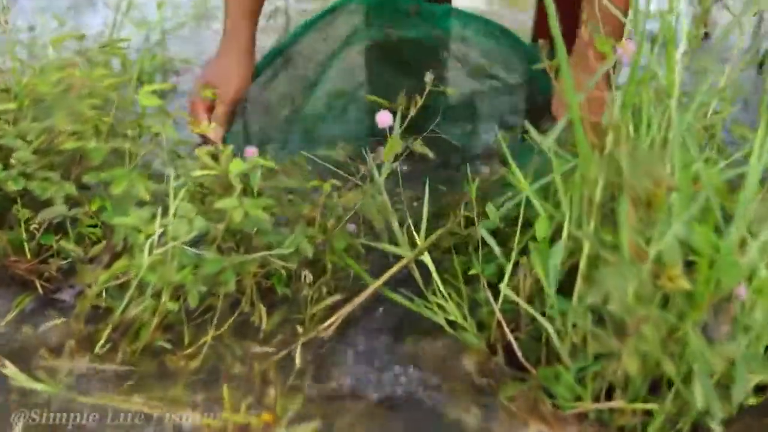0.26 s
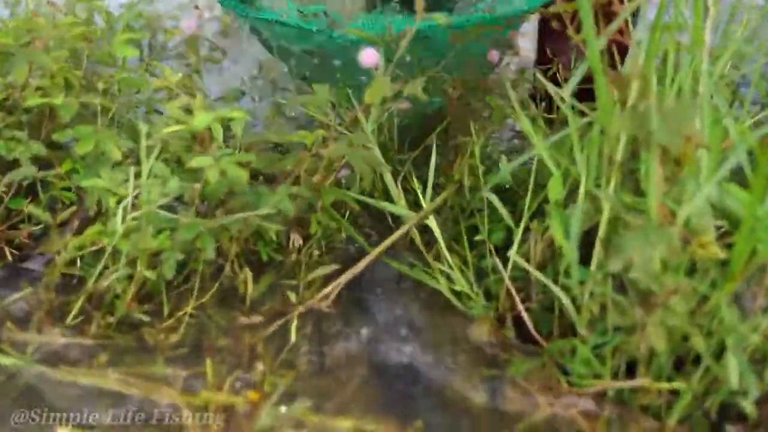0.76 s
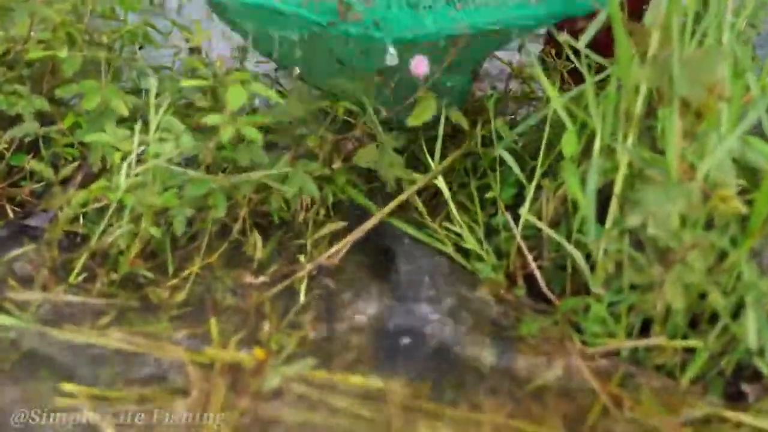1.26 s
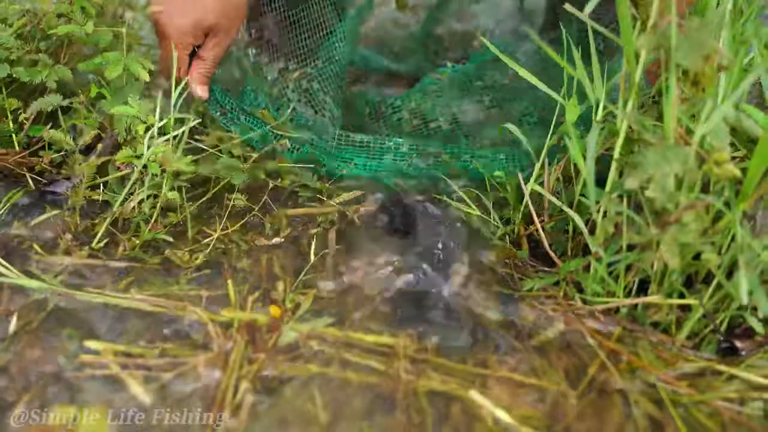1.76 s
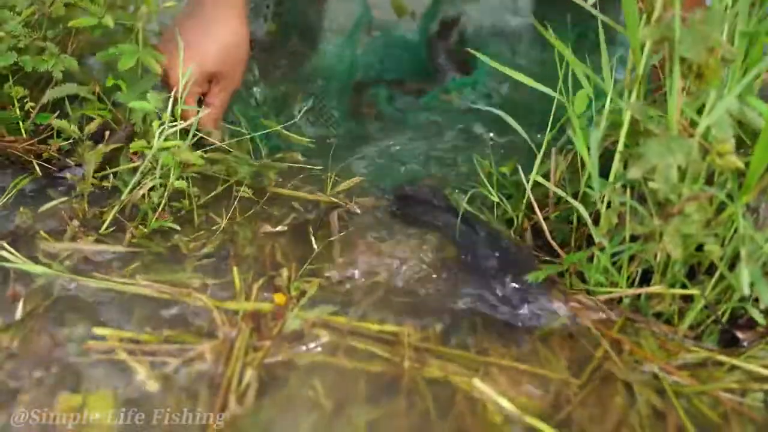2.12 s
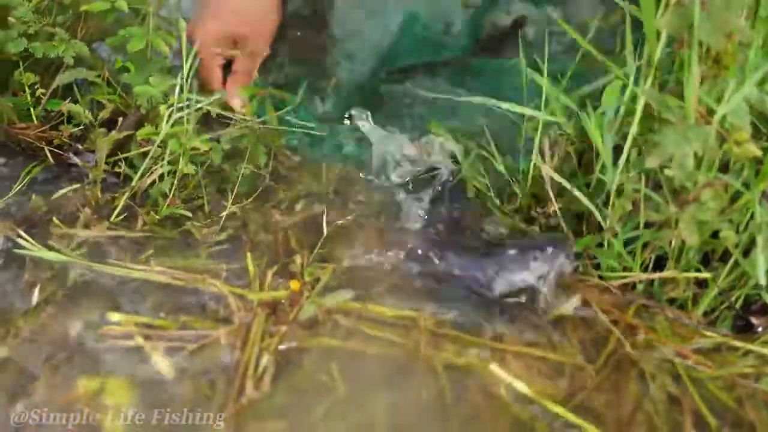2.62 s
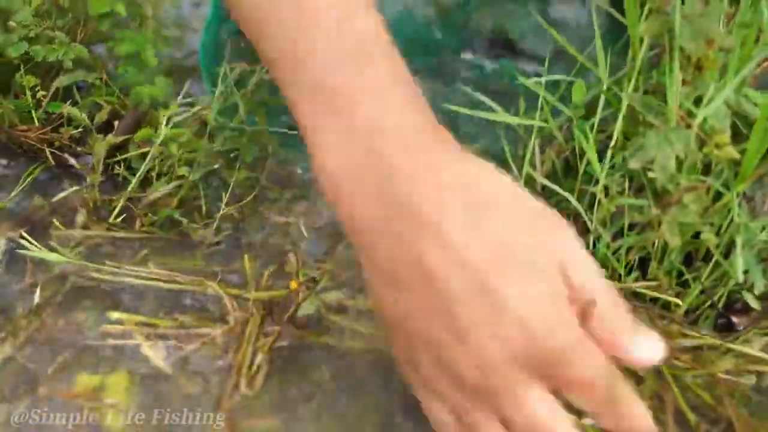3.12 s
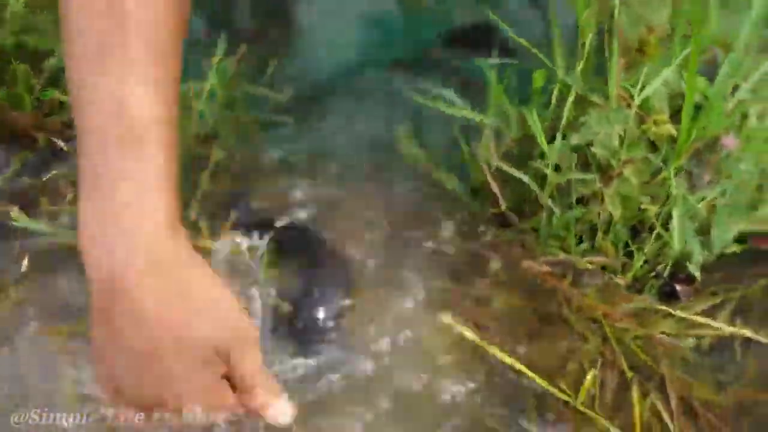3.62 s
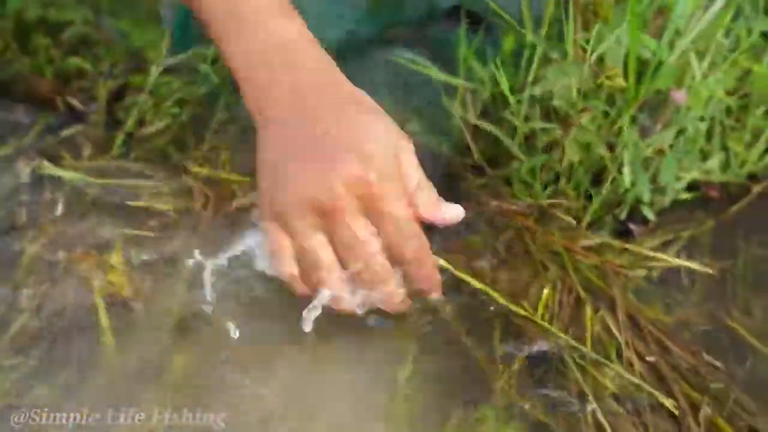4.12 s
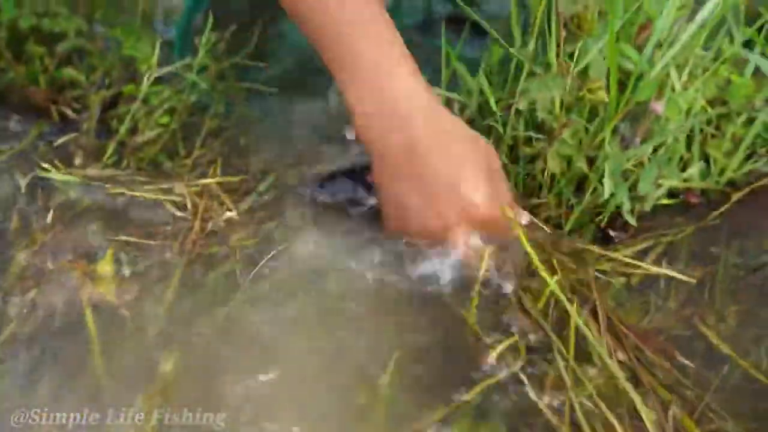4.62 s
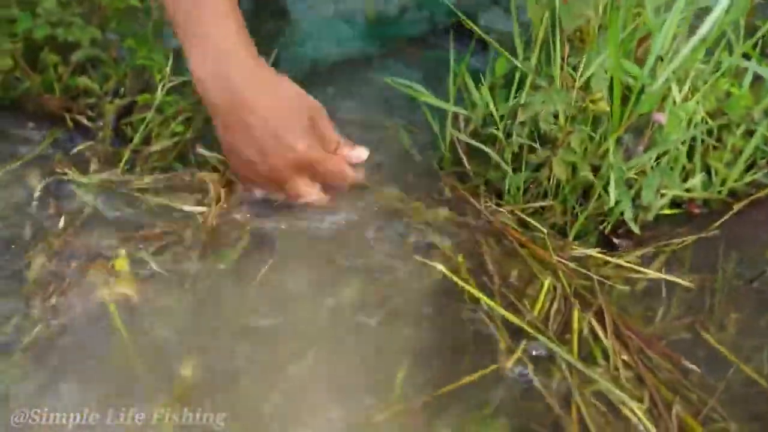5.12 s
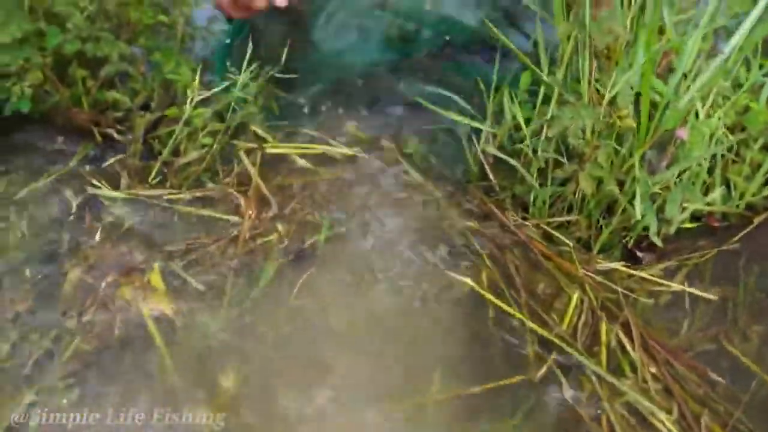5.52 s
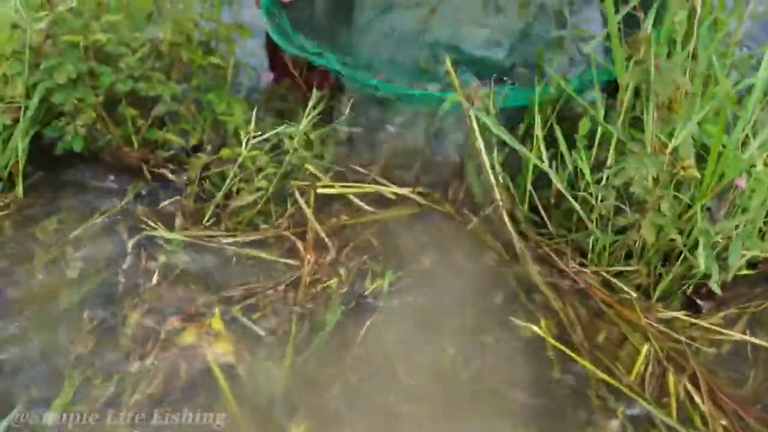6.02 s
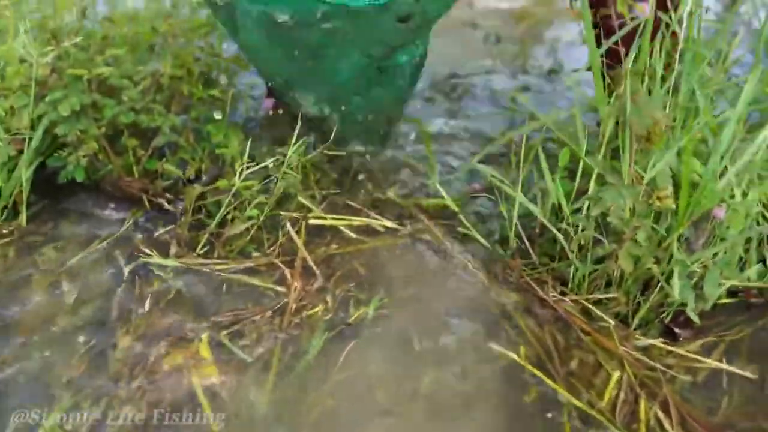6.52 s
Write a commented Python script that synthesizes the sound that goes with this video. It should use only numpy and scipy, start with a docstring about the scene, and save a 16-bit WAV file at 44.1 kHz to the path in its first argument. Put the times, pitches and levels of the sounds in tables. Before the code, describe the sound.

A fish thrashes in shallow grassy floodwater, with bursts of bubbly splashing, gulping plops and fine spray, then trickling drips over a faint outdoor hum.

```python
"""In shallow floodwater among grass, a fish thrashes close by while hands and a net chase it.
Air trapped by the splashes rings as bubbles, many with rising pitch: deep gulps, plips, fizz and fine spray.
Single plops, ticking droplets and stray drips stand out, and a short scattered tail follows the water.
A far drone, light wind on the microphones and a soft bed of coloured noise lie underneath."""
import sys
import numpy as np
from scipy import signal
from scipy.fft import rfft, irfft
from scipy.io import wavfile
from scipy.ndimage import uniform_filter1d

SR = 44100
rng = np.random.default_rng(int(sys.argv[2]) if len(sys.argv) > 2 else 0)


def put_to_file(sound):
    """Save the sound as 16-bit audio at rate SR, in the file named by the first command-line argument."""
    columns = np.atleast_2d(sound).T  # one column per channel
    safe = np.clip(columns, -1, 1)
    whole_steps = np.round(safe * 32767)
    wavfile.write(sys.argv[1], SR, whole_steps.astype(np.int16))


N = 298116


def gain_of(db):
    """Turn decibels into an amplitude factor."""
    return 10 ** (np.asarray(db) / 20)


def evened(x):
    """Scale to an average (RMS) level of 1."""
    return x / np.sqrt(np.mean(x ** 2) + 1e-20)


def sides(pan_db):
    """Left and right gains for a given left-minus-right difference in dB."""
    return gain_of(np.array([pan_db / 2, -pan_db / 2]))


def add(mix, start_s, sound):
    """Add a sound to the mix at its start time, cut off at the end of the mix."""
    part = mix[:, round(start_s * SR):][:, :sound.shape[1]]
    part += sound[:, :part.shape[1]]


def thrashing():
    """Gains of fizz, gulps and spray and the left-right lean: splashes rise, hold and settle over a trickle."""
    # Splashes of fish, hand or net. Each row: start in seconds, hold in seconds, fizz level in dB,
    # gulps in dB relative to fizz, spray in dB relative to fizz, left minus right in dB.
    splashes = [(0.034, 0.013, -53.5, -1, 1, -0.5), (0.56, .13, -55, -10, 0, -.5),
                (1.233, 0.026, -59, 0, -11, -1), (1.587, 0.074, -44, -0.5, -4.5, -2),
                (1.70, 0.17, -42.5, -8.5, -6, 0.5), (2.386, 0.13, -45.5, -6.5, -5, -4.5),
                (2.522, 0.042, -43, 3, -6, -5), (2.605, 0.045, -42.5, -16, -6, -2.5),
                (2.69, 0.02, -39, -4, -3, -2), (2.742, 0.071, -46, 0.5, -7, -3.5),
                (2.841, 0.1, -52, -6.5, -2.5, -2), (3.102, 0.014, -48, -9, -4.5, -1),
                (3.243, 0.13, -54.5, -9.5, -9, -3), (3.465, 0.04, -45.5, -14, -6, -2),
                (3.619, 0.013, -43, -27, -1, 1), (3.659, 0.015, -45, -3.5, -14, .5),
                (4.132, 0.068, -47.5, -5.5, -7.5, -0.5), (4.286, 0.018, -39.5, -21, -5, -1.5),
                (4.346, 0.031, -48.5, -4, -15, -1.5), (4.524, .04, -57, -1, -3, -2.5),
                (4.578, 0.082, -48, -4, -6, -1.5), (4.70, 0.059, -53.5, -5.5, -7, -2.5),
                (4.853, 0.023, -47.5, -10, -7, -2.5), (4.945, .025, -46, -7, -8.5, 0.5),
                (5.393, 0.072, -59.5, -21, 1.5, 0), (5.999, 0.085, -52, -26, -2, -3.5),
                (6.13, 0.21, -56.5, -11, -4, -3), (6.244, 0.15, -53, -15, -8, -1.5),
                (6.406, 0.16, -53.5, -7, -6, 0)]
    # Water running and dripping between splashes. Each row: time in seconds, fizz level in dB.
    trickle = [(0, -61.5), (.35, -63.5), (.8, -62.5), (1.4, -64), (2.0, -59.5), (3.0, -59), (3.8, -64),
               (4.5, -65.5), (5.1, -67.5), (5.3, -64), (5.55, -74.5), (5.88, -71), (6.1, -59), (6.76, -61)]
    rise_db_per_s, fall_db_per_s = 312, 245
    t = np.arange(0, N / SR + .002, .001)  # one step per millisecond
    trickle_db = np.interp(t, *np.transpose(trickle))
    power = [gain_of(2 * trickle_db)]  # doubling the dB gives power, so overlapping splashes can be summed
    mix = [(-5, 0.5, -1.5)]  # gulp, spray and pan of the trickle, in dB
    for start, hold, db, *colour in splashes:
        early = np.maximum(start - t, 0)
        late = np.maximum(t - start - hold, 0)
        level_db = db - rise_db_per_s * early - fall_db_per_s * late
        power.append(gain_of(2 * level_db))
        mix.append(colour)
    gulp_db, spray_db, pan_db = np.transpose(mix)
    fizz_power = np.sum(power, 0)
    gulp_power = gain_of(2 * gulp_db) @ power
    spray_power = gain_of(2 * spray_db) @ power
    lean_db = pan_db @ power / fizz_power  # the strongest splash decides the lean
    slow = np.sqrt(fizz_power), np.sqrt(gulp_power), np.sqrt(spray_power), lean_db
    return [np.interp(np.arange(N) / SR, t, curve) for curve in slow]


def bubble(hz, decay_s, rise, onset=0.13):
    """A pocket of air rings and fades, its pitch climbing as it nears the surface; its envelope peaks at 1."""
    u = np.arange(round(7 * decay_s * SR) + 8) / (decay_s * SR)  # time counted in decay times
    u = u / max(1, 1.5 / (hz * decay_s))  # stretch the briefest blips to a decay of 1.5 cycles
    shape = (1 - np.exp(-u / onset)) * np.exp(-u)
    pitch = np.minimum(hz * (1 + rise * np.minimum(u, 4)), SR / 2)
    phase = 2 * np.pi * np.cumsum(pitch) / SR
    return shape / shape.max() * np.sin(phase)


def swarm(lo_hz, hi_hz, tilt_db, cycles, per_s, spread_db, clump_db, width_s, count=40):
    """Many small bubbles of random size, bunched in time, placed between the microphones by small delays."""
    bunches = gain_of(clump_db * evened(uniform_filter1d(rng.standard_normal(N), size=300)))
    size = gain_of(spread_db * np.minimum(rng.exponential(1, N), 4))
    happens = rng.random(N) < per_s / SR
    strikes = size * happens * bunches * rng.choice([-1, 1], N)
    kind = rng.integers(0, count, N)  # each bubble takes one of a few ring shapes
    out = np.zeros((2, N))
    for k, (detune, rise, long, place) in enumerate(rng.random((count, 4))):
        step = (k + detune) / count
        hz = lo_hz * (hi_hz / lo_hz) ** step
        decay_s = cycles * (.5 + long) / hz
        ring = gain_of(tilt_db * step) * bubble(hz, decay_s, 0.188 * rise, 0.12)
        sound = signal.oaconvolve(strikes * (kind == k), ring)[:N]
        lag = round((2 * place - 1) * width_s * SR)  # path difference to the two microphones, in samples
        out += [sound, np.roll(sound, lag)]
    return evened(out)


def churn(fizz_gain, gulp_gain, spray_gain):
    """Bubble swarms from deep gulps to fine spray follow the thrashing; the spray leans right."""
    gulps = swarm(562.0, 1384, 8.6, 3.37, 600, 3.2, 4.8, .00009, count=14)
    plips = swarm(697, 3610, 2.0, 8.4, 90, 3.3, 1.46, .0001, count=14)  # longer ringing bubbles
    fizz = swarm(1222, 5190, 6.9, 3.17, 2800, 1.85, 2.63, 0.000079, count=22)
    spray = swarm(5310, 15200, -1.5, 2.27, 7000, 2.45, 2.15, .0003, count=18)
    spray = spray * sides(-1.9)[:, None]
    plips_db = -13.5  # relative to fizz
    fizz_and_plips = fizz + gain_of(plips_db) * plips
    return fizz_gain * fizz_and_plips + gulp_gain * gulps + spray_gain * spray


def bubbles():
    """The plops and blips that stand out, each one ringing pocket of air."""
    # Each row: start in seconds, peak level in dB before panning, starting pitch in Hz,
    # decay time in milliseconds (very short ones get stretched), share the pitch rises per decay time.
    plops = [(0.052, -39.5, 1540, 1.6, 0.02), (0.2635, -48, 797, 12, 0.11), (0.382, -38, 3640, 0.54, 0),
             (0.587, -39, 1584, 5.9, 0.02), (0.7172, -35.5, 3060, 0.6, 0.06), (1.086, -53, 1040, 8.4, 0.14),
             (1.145, -53, 1310, 7.7, 0), (1.175, -52, 1300, 5.8, 0.04), (1.205, -53, 1320, 6.2, 0),
             (1.247, -48.5, 1310, 7.4, 0), (1.29, -54, 1320, 6, 0), (1.33, -57, 1340, 6, 0),
             (1.5523, -44, 1580, 15, 0.01), (1.5546, -31.5, 2160, 2.6, 0.09), (1.5776, -45, 1260, 6.7, 0.4),
             (1.6028, -32, 735, 9.3, 0.05), (1.6441, -40.5, 1186, 13.4, 0.33),
             (1.7645, -39, 786, 9.9, 0.08), (1.8659, -18.5, 1222, 3.5, 0.06),
             (1.9397, -38.5, 3230, 1.7, 0.04), (2.0375, -47.5, 473, 34, 0.07), (2.3317, -39.5, 385, 3.0, 0),
             (2.384, -43, 875, 14, 0.27), (2.3873, -33, 1610, 2, 0.08), (2.4205, -37, 1720, 4.1, 0.06),
             (2.441, -30.5, 3700, 0.55, 0), (2.5166, -35, 740, 6.4, 0.2), (2.5275, -31, 1167, 6.2, 0.04),
             (2.5306, -39, 820, 4.2, 0.17), (2.5363, -28, 1280, 2.8, 0), (2.5753, -40, 1210, 6.4, 0),
             (2.651, -39, 548, 12, 0.3), (2.6538, -25.5, 2150, 1.6, 0.02), (2.684, -30, 2520, 2, 0.03),
             (2.6968, -35, 2110, 6.7, 0), (2.702, -19.5, 2600, 0.32, 0), (2.7068, -26.5, 1100, 1.3, 0.08),
             (2.7456, -34, 2720, 3.4, 0), (2.7522, -20, 2270, 0.5, 0), (2.7543, -31, 1870, 7, 0.1),
             (2.7646, -25.5, 1520, 1.8, 0), (2.7723, -30, 1414, 4.3, 0.07), (2.78, -28.5, 1590, 2.9, 0.03),
             (2.7846, -31, 2000, 3.7, 0), (2.8148, -33, 1200, 1.3, 0.2), (2.8491, -34.5, 1520, 6.1, 0),
             (2.935, -32.5, 2900, 1.1, 0.06), (3.018, -37.5, 3800, 2, 0.11), (3.038, -45, 1950, 4, 0.03),
             (3.0853, -30, 1820, 3.5, 0.04), (3.1011, -44.5, 950, 21, 0.43),
             (3.1106, -32.5, 2370, 0.5, 0.25), (3.137, -37, 2340, 2, 0.06),
             (3.3083, -38.5, 3200, 2.7, 0.07), (3.402, -43, 1470, 9.0, 0), (3.4314, -36, 953, 8, 0.17),
             (3.455, -31.5, 1830, 2.9, 0.4), (3.4796, -25, 2070, 0.97, 0.21),
             (3.495, -32.5, 1200, 5.8, 0.38), (3.5212, -37, 3040, 1.2, 0), (3.555, -41, 2350, 3, 0.08),
             (3.6118, -26, 1365, 5.3, 0.22), (3.6469, -29.5, 1370, 4.1, 0.3), (3.665, -35, 1646, 9.6, 0.23),
             (3.668, -21, 3000, 0.8, 0), (3.6754, -22.5, 1780, 1.1, 0.1), (3.6792, -23, 2290, 0.85, 0.16),
             (3.6979, -36.5, 815, 2.6, 0), (3.725, -47, 1600, 2.7, 0.05), (3.9686, -39.5, 2660, 2.3, 0),
             (4.0441, -30, 3700, 1.6, 0), (4.076, -40.5, 2700, 1.5, 0), (4.1186, -37.5, 920, 8.4, 0.06),
             (4.1448, -31.5, 790, 1.9, 0), (4.1533, -29, 1050, 6.2, 0.03), (4.1802, -40.5, 1293, 17.5, 0.3),
             (4.2022, -28, 1590, 1, 0.03), (4.2771, -44.5, 648, 18, 0.12), (4.28, -37, 3870, 5.6, 0.03),
             (4.2878, -22, 4300, 0.48, 0.04), (4.2911, -30.5, 2250, 2.2, 0.06),
             (4.304, -29, 1600, 1.5, 0.05), (4.3408, -37, 1664, 9.6, 0.33), (4.3442, -32, 2450, 1.5, 0.06),
             (4.3592, -35.5, 1200, 7.8, 0.7), (4.3758, -41, 1585, 12, 0.3), (4.3829, -25.5, 2670, 0.34, 0),
             (4.411, -41, 2100, 1.5, 0), (4.457, -45, 2500, 1, 0.07), (4.518, -42.5, 2320, 4, 0),
             (4.5842, -31, 1350, 4, 0), (4.612, -42, 576, 15, 0.24), (4.6755, -42.5, 686, 14, 0.53),
             (4.715, -35.5, 2490, 3.6, 0.1), (4.8537, -39, 3210, 2.3, 0), (4.8654, -35.5, 1980, 3.0, 0),
             (4.939, -34, 1130, 3.5, 0), (4.9642, -28, 3540, 0.19, 0.03), (5.015, -43.5, 2160, 3, 0.08),
             (5.0432, -46, 1600, 9.1, 0.44), (5.215, -51.5, 2130, 4.4, 0.06),
             (5.3952, -33, 4300, 0.46, 0.15), (5.418, -45, 2100, 2.4, 0.3), (5.446, -39, 4130, 1.3, 0.04),
             (5.4578, -42.5, 2720, 2.9, 0.08), (5.5, -49, 1890, 2.6, 0.02), (5.605, -57, 2490, 3, 0),
             (5.745, -50.5, 2610, 2.8, 0.1), (5.802, -50.5, 2120, 2.7, 0.1),
             (6.096, -37.5, 3030, 0.92, 0.05), (6.197, -44, 1410, 6.7, 0.03), (6.227, -38, 2210, 2, 0.12),
             (6.247, -32, 2100, 1.7, 0.13), (6.265, -39, 2740, 2.6, 0), (6.297, -37, 2200, 1.7, 0),
             (6.3533, -40, 1710, 3.2, 0.11), (6.383, -39, 1250, 2.4, 0), (6.4488, -25.5, 2540, 0.13, 0.03),
             (6.5117, -43.5, 923, 7.9, 0.47), (6.5488, -22, 3660, 0.1, 0.04),
             (6.6723, -39, 2190, 1.2, 0.04)]
    out = np.zeros((2, N))
    for start_s, db, hz, decay_ms, rise in plops:
        add(out, start_s, gain_of(db) * bubble(hz, decay_ms / 1000, rise)[None])
    return out


def drops():
    """A droplet hits water, leaves or mesh: a sharp snap, a short ring and a puff of finer spatter."""
    # Each row: start in seconds, level in dB before the parts are weighted, ring pitch in Hz.
    hits = [(0.0581, -41, 6040), (0.6604, -37.5, 9350), (0.6894, -41, 6840), (0.887, -50.5, 10600),
            (1.072, -50, 8000), (1.1134, -48.5, 9500), (1.124, -48, 9200), (1.1724, -49, 6000),
            (1.208, -49, 12800), (1.2205, -37.5, 5600), (1.299, -54, 10500), (1.719, -38, 7500),
            (1.794, -34.5, 6260), (1.81, -42, 4840), (1.8465, -34, 5630), (1.8996, -43, 5850),
            (2.426, -50, 4660), (2.9222, -36.5, 5140), (3.019, -46, 4150), (3.0642, -46, 8500),
            (3.1102, -36, 6440), (3.2293, -45.5, 8800), (3.3552, -45.5, 6140), (3.6199, -35, 9960),
            (3.634, -38, 9000), (3.679, -32, 5830), (4.042, -42.5, 4160), (4.0958, -40, 7900),
            (4.1547, -45, 6460), (4.1895, -38, 6040), (4.259, -46, 6100), (4.642, -43, 5900),
            (4.6596, -39, 5800), (4.838, -48, 5200), (4.85, -45, 6200), (4.8626, -42, 5600),
            (4.908, -45, 8780), (4.9383, -44, 7140), (5.3754, -45.5, 5660), (5.51, -51.5, 7200),
            (6.255, -45, 8800), (6.545, -43, 4500), (6.739, -46.5, 5240)]
    out = np.zeros((2, N))
    t = np.arange(500) / SR
    hiss = signal.lfilter([1, -.9], [1, -.6], rng.standard_normal((len(hits), 2, 500)))
    snap = (1 - t / .00006) * np.exp(-t / .00006)
    for (start_s, db, hz), puff in zip(hits, hiss):
        ring = np.sin(2 * np.pi * hz * t) * np.exp(-t / 0.0012)
        spatter = puff * (0.91 * np.exp(-t / 0.00055) + 0.39 * np.exp(-t / 0.011))
        add(out, start_s, gain_of(db) * (2.9 * snap + 1.97 * ring + spatter))
    return out


def drips():
    """Stray drips from grass and mesh ring high and short all the time."""
    level_db, drips_per_s = -68, 45
    return gain_of(level_db) * swarm(1797, 11500, -1.0, 6.2, drips_per_s, 3.0, 1.9, 0.00024, count=18)


def surroundings(x):
    """Grass and banks scatter a short tail back, its pattern shifting; its bass is common to both sides."""
    t, out = np.arange(2500) / SR, 0
    for turn in (np.sin, np.cos):  # two tails trade places smoothly
        middle, side = rng.standard_normal((2, 2500))
        side = signal.lfilter([1, -1], [1, -.75], side)  # takes the bass out of the difference
        fade = gain_of(-60 * t / .055) * (t > .0015)  # falls 60 dB in 55 ms, after a 1.5 ms gap
        tail = np.array([middle + side, middle - side]) * fade
        share = turn(2 * np.pi * 3.3 * np.arange(N) / SR)
        out += signal.oaconvolve(x * share, tail / np.linalg.norm(tail[0]), axes=1)[:, :N]
    return gain_of(-11) * out


def read(points, hz):
    """Read a curve at the given frequencies, joining its points along a logarithmic pitch scale."""
    f, value = np.transpose(points)
    return np.interp(np.log(hz + 1), np.log(f + 1), value)


def noise(colour, patchy_db):
    """Stereo noise of a given colour with drifting louder and softer patches."""
    # How alike left and right are. Each row: frequency in Hz, likeness from 0 (unrelated) to 1 (identical).
    likeness = [(40, .975), (130, .97), (300, .92), (650, .6), (1400, .05), (16000, .01)]
    frames, hz = N // 512 + 5, np.fft.rfftfreq(2048, 1 / SR)
    a, b, c, d, patches = rng.standard_normal((frames, 1025, 5)).T
    patches = uniform_filter1d(patches, size=8, axis=1)  # smooth over time
    patches = evened(uniform_filter1d(patches, size=12, axis=0))  # and over frequency
    same = np.clip(read(likeness, hz), -1, 1)[:, None]
    left = a + 1j * b
    right = same * left + np.sqrt(1 - same ** 2) * (c + 1j * d)
    spectrum = np.array([left, right])
    spectrum *= gain_of(read(colour, hz)[:, None] + patchy_db * patches)
    return evened(signal.istft(spectrum, nperseg=2048, noverlap=1536)[1][:, :N])


def wind():
    """Wind on the microphones: low rumbling noise that swells and comes in lumps."""
    # Each row: time in seconds, level in dB before the lumps.
    gusts = [(0.0, -55.5), (0.64, -49.5), (0.69, -31.5), (0.8, -42.5), (0.95, -50.5), (1.12, -46.5),
             (1.51, -52), (1.76, -44), (1.89, -57), (2.61, -60), (3.5, -60), (4.08, -50), (4.4, -57),
             (4.63, -52.5), (5.54, -59), (5.81, -47.5), (5.94, -55), (6.14, -48), (6.73, -61)]
    # Each row: frequency in Hz, relative strength in dB per Hz.
    rumble_colour = [(15, -41), (35, -27), (60, 4), (100, 1), (200, -12), (500, -36.5), (1500, -66)]
    level_db = np.interp(np.arange(N) / SR, *np.transpose(gusts))
    lumps = uniform_filter1d(rng.standard_normal(N), size=1500)
    lumps = evened(uniform_filter1d(lumps, size=1500))
    return gain_of(level_db + 0.64 * lumps) * noise(rumble_colour, 1.2)


def drone():
    """A far, low, wavering hum: noise ringing in a few broad resonances, nearly alike on both sides."""
    # Each row: centre in Hz, width at half amplitude in Hz, level in dB.
    resonances = [(138.3, 13.3, -55.5), (176, 36, -58.5), (97, 93, -56), (254, 88, -64.5),
                  (427.7, 7.3, -75)]
    hz = np.fft.rfftfreq(N, 1 / SR)
    middle, side = rfft(rng.standard_normal((2, N)))
    spectrum = middle + gain_of(-17) * np.array([side, -side])
    out = 0
    for centre, width, db in resonances:
        resonance = 1 / (1 + (2 * (hz - centre) / width) ** 2)
        out = out + gain_of(db) * evened(irfft(spectrum * resonance, N))
    return out


def field():
    """A steady soft bed of coloured noise with gently drifting patches."""
    # Each row: frequency in Hz, relative strength in dB per Hz.
    bed_colour = [(30, -42), (150, -4.5), (300, 0.5), (600, -7.5), (1100, -15.5), (3000, -18.5),
                  (7000, -26), (16000, -40)]
    level_db = -55.5
    return gain_of(level_db) * noise(bed_colour, 1.83)


def scene():
    """The water leans left and right with the splashes, over wind, drone and the noise bed."""
    *gains, pan_db = thrashing()
    water = churn(*gains) + bubbles() + drops() + drips()
    water = water * sides(pan_db)
    return water + surroundings(water) + wind() + drone() + field()


def record(dry):
    """Cut the highest treble with a steep low-pass filter."""
    edge_hz = 15900
    low_pass = signal.firwin(511, edge_hz, window=("kaiser", 9), fs=SR)
    return signal.oaconvolve(dry, low_pass[None], "same")


dry = scene()
out = record(dry)
put_to_file(out)
```